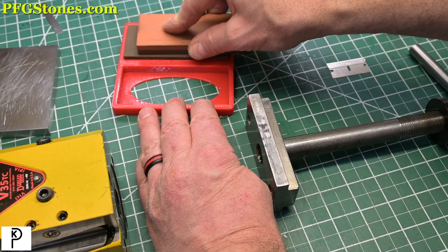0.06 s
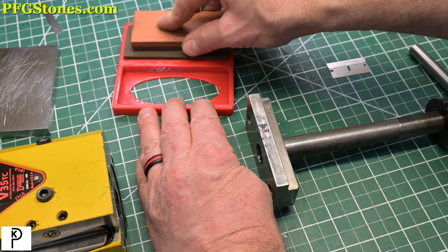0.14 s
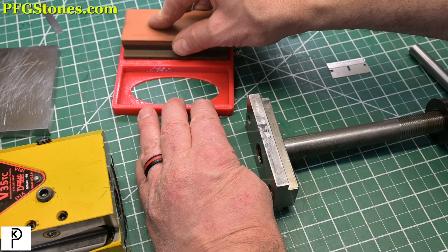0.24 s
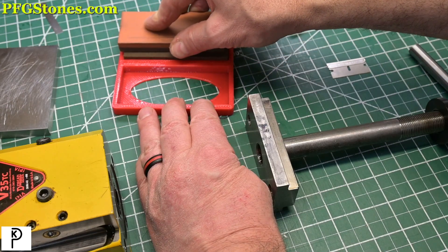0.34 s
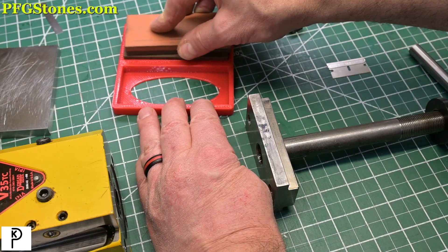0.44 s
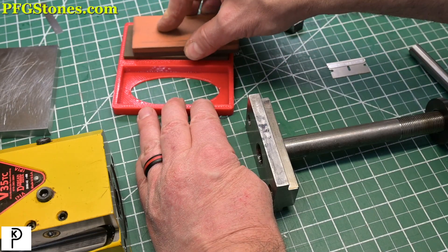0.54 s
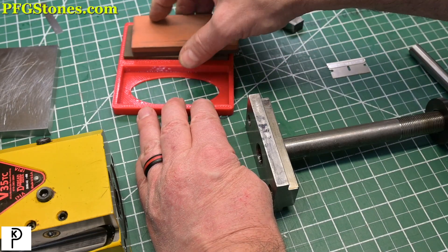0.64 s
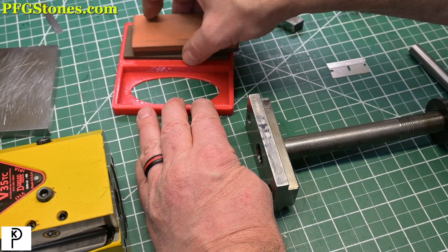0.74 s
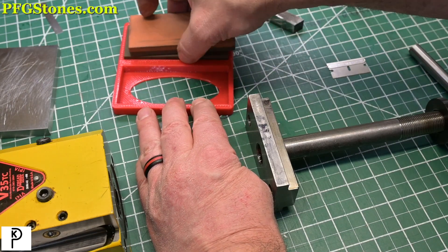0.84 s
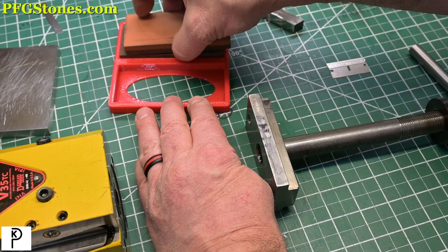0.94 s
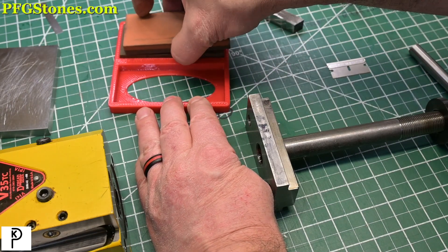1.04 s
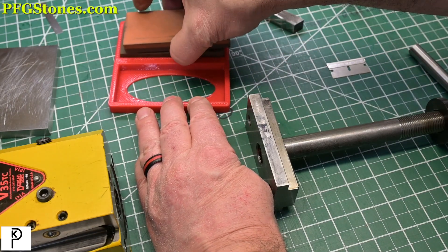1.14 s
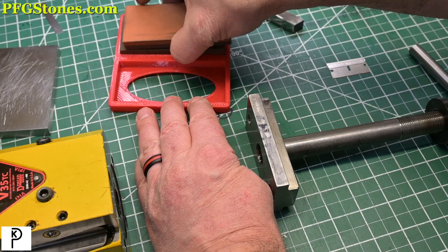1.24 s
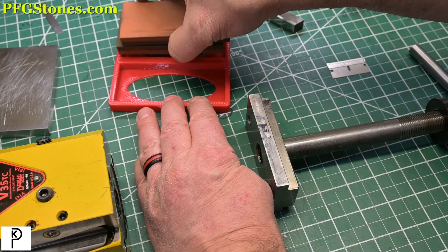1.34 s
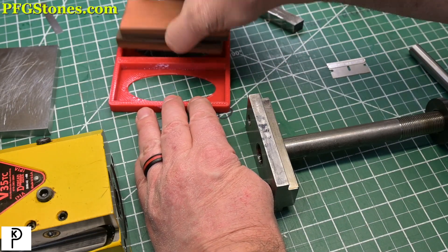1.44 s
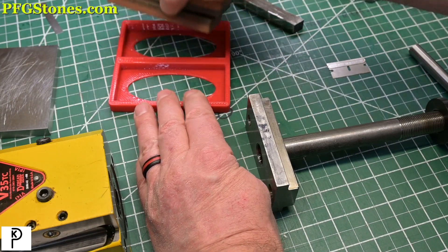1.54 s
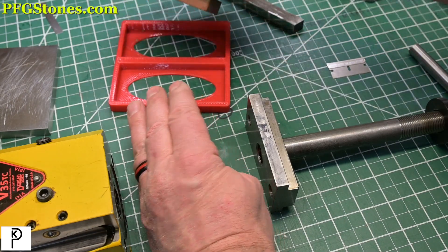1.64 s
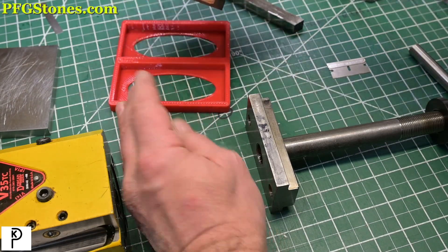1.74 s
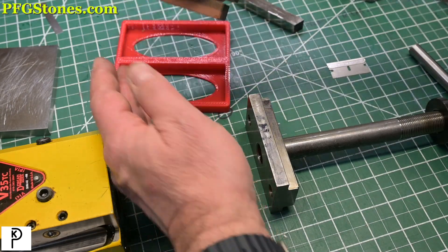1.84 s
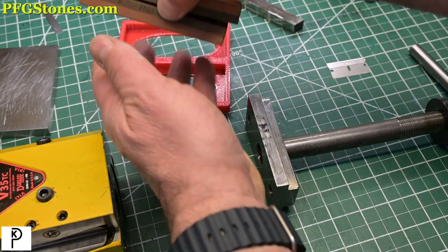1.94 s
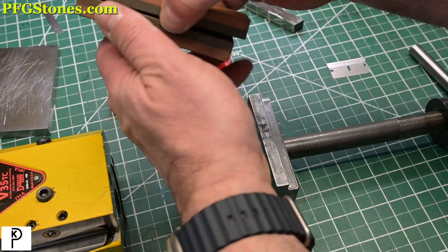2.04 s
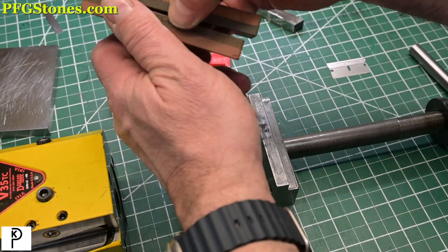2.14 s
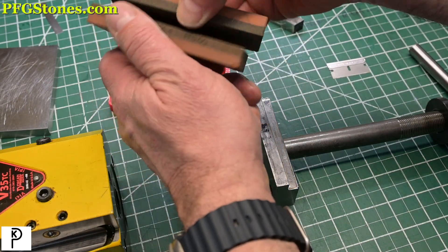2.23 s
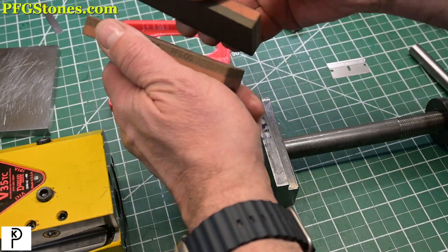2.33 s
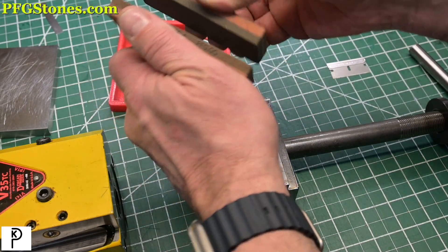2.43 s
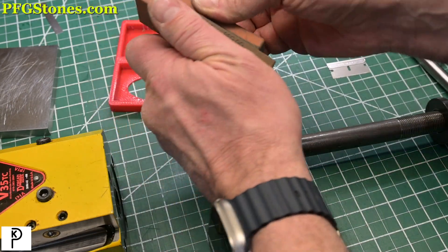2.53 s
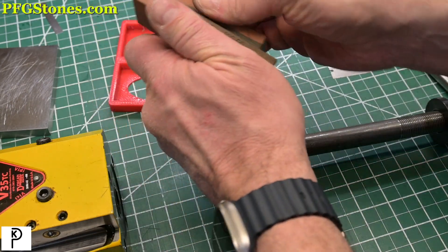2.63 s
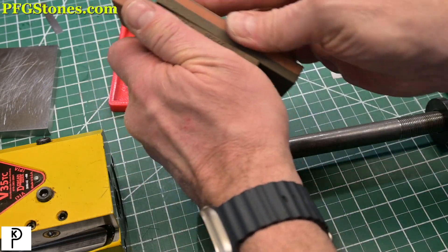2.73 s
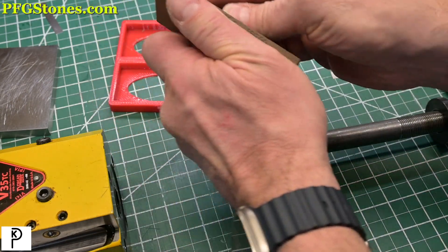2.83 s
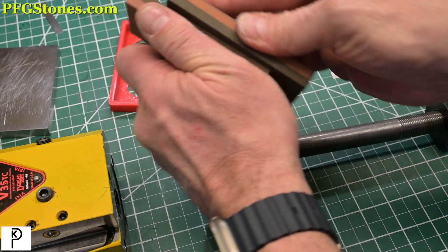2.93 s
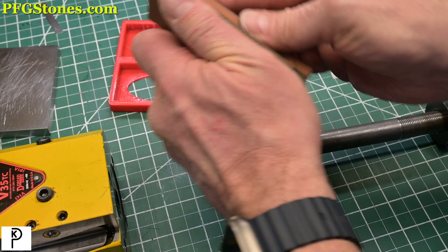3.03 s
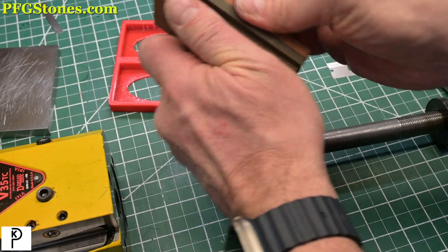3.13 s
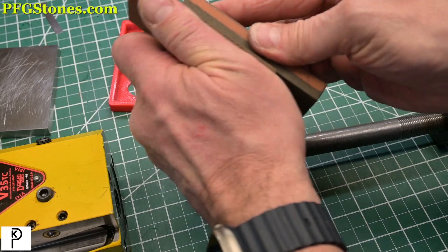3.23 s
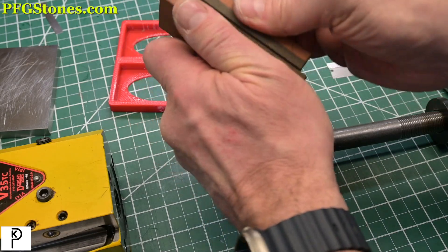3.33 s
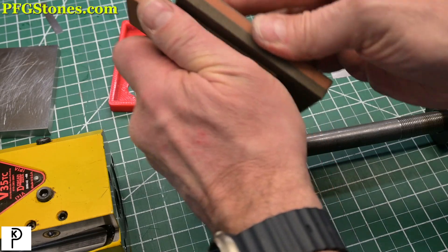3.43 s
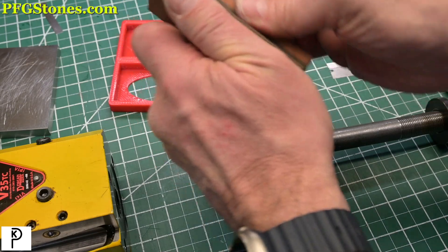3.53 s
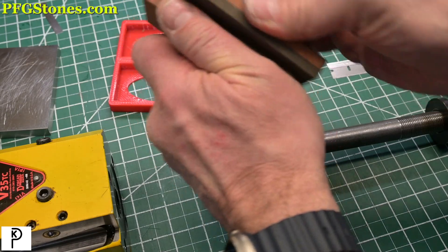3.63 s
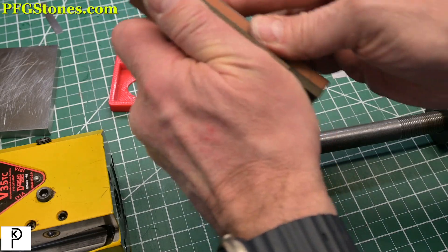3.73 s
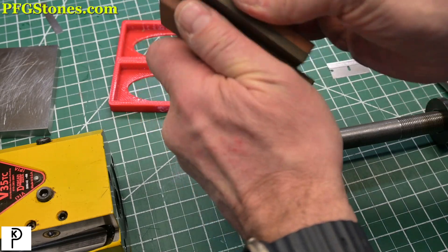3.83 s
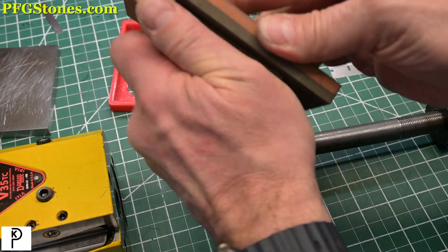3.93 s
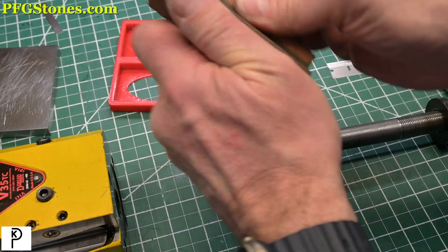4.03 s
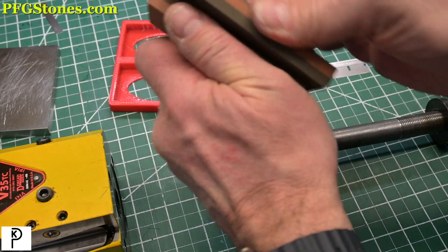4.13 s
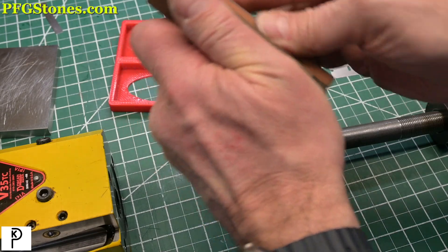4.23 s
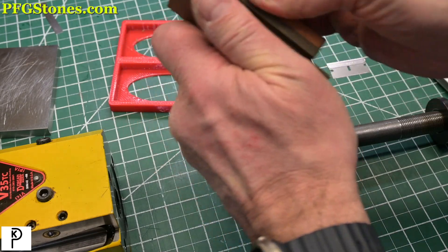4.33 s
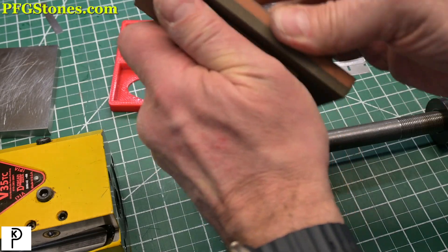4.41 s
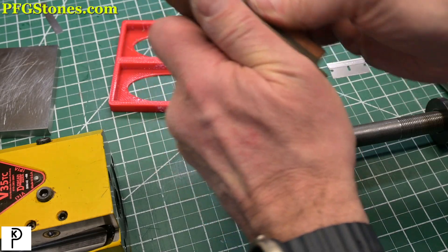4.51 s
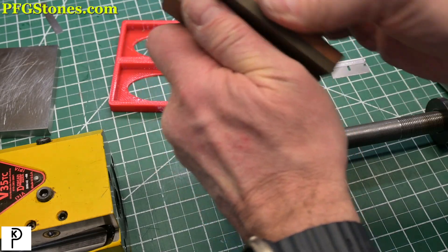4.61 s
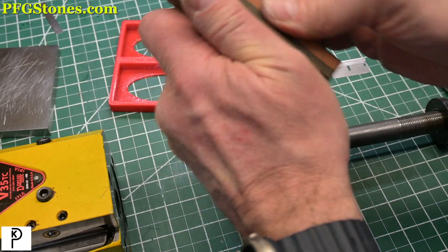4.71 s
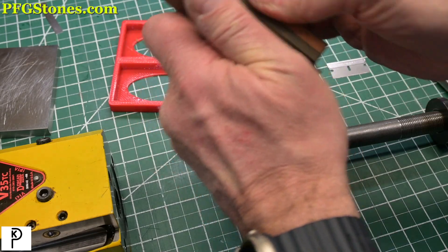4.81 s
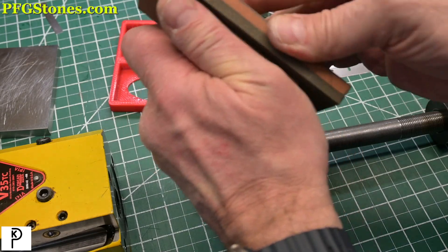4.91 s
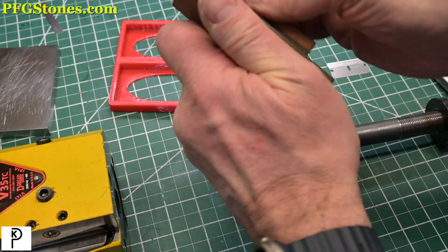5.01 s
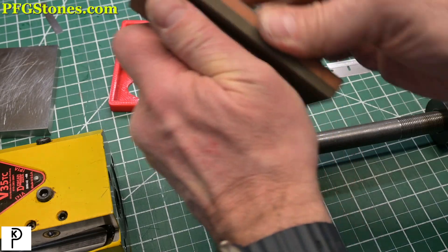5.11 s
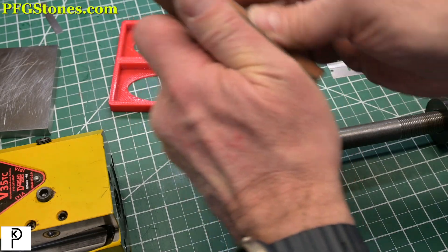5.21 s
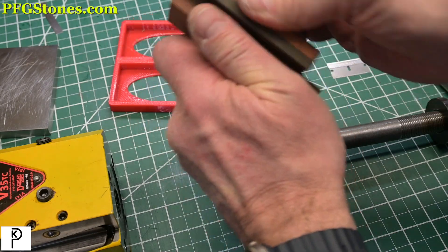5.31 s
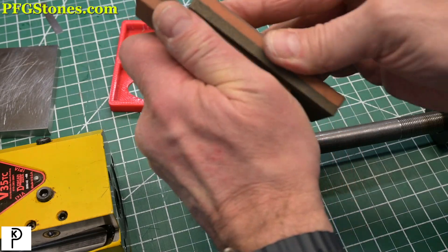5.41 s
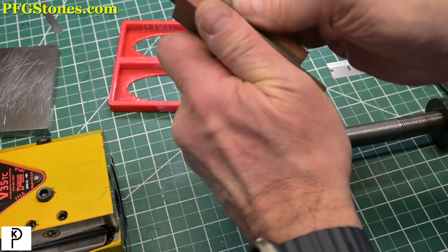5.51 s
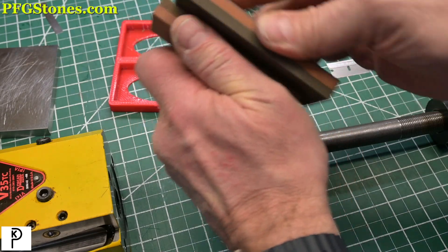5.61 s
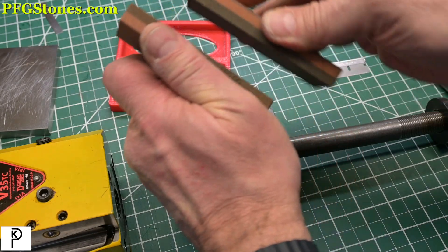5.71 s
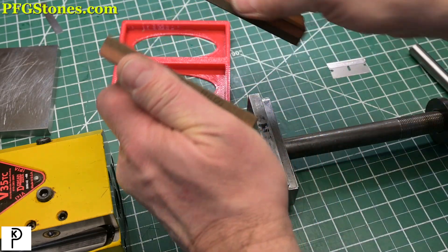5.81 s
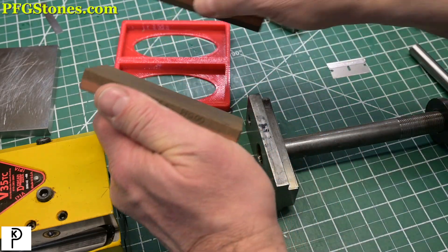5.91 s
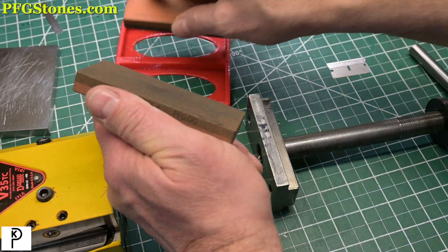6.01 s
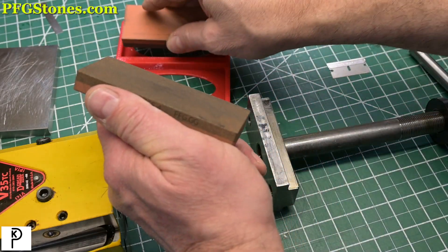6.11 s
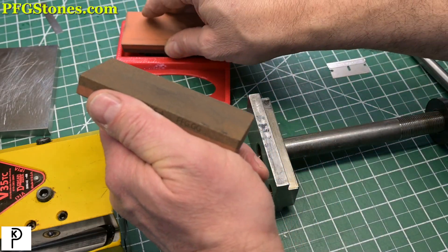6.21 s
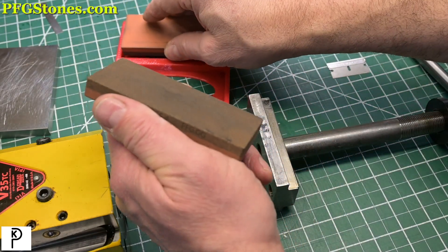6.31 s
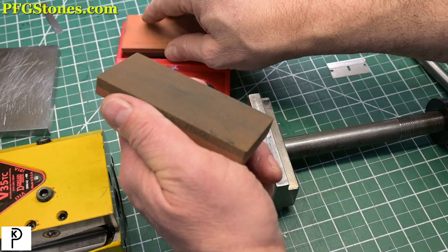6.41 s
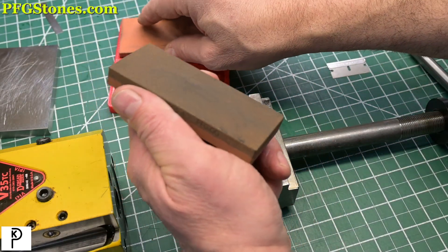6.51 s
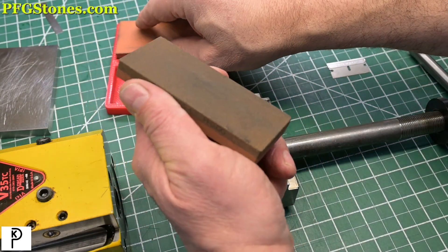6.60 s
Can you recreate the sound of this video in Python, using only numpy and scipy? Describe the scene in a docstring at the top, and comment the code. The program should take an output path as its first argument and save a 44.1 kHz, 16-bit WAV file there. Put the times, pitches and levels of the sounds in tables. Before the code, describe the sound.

A close microphone hears faint, dry stone scuffs over soft ventilation hum, then a sharp plastic snap and a short pause. Two stones meet in a quick double clack, the loudest sound, and rub face to face for about three seconds: a rhythmic swishing grind with hollow, sliding resonances. A small high ring ends the rubbing, and a very soft plastic tap is heard in the quiet, lightly reflective workshop.

```python
"""A small workshop with a low ventilation rumble, where a sharpening stone is slid about in its plastic tray.
It is pulled free with a snap, then clacked onto a second stone; decaying modes and bursts of noise make the blows.
The two are rubbed face to face in quick circles: random clicks make the grit hiss and drive resonances
that glide as the overlap of the faces changes. The stones ring as they part, and one is set back in the tray."""
import sys
import numpy as np
from scipy import signal
from scipy.fft import rfft, irfft
from scipy.io import wavfile
from scipy.ndimage import uniform_filter1d, minimum_filter1d

SR = 44100
rng = np.random.default_rng(int(sys.argv[2]) if len(sys.argv) > 2 else 0)


def digitize_waveform(pressure):
    """Quantize a signal to 16-bit integers and store it at the path in sys.argv[1].

    Rows of a 2-D input are taken as channels; values are limited to [-1, 1].
    """
    field = np.atleast_2d(pressure).T
    bounded = np.clip(field, -1, 1)
    quanta = np.round(bounded * 32767).astype(np.int16)
    wavfile.write(sys.argv[1], SR, quanta)


N = 293472
TIME = np.arange(N) / SR


def amp(db):
    """Decibels to gain."""
    return 10 ** (np.asarray(db) / 20)


def unit(x):
    """Scales to rms 1."""
    return x / np.sqrt(np.mean(x ** 2) + 1e-20)


def noise():
    """White noise for the whole scene."""
    return rng.standard_normal(N)


def read(points, hz):
    """Reads a curve of (pitch_hz, value) points on a log-frequency axis."""
    point_hz, value = np.transpose(points)
    return np.interp(np.log(hz + 1), np.log(point_hz), value)


def colour(x, spectrum):
    """Filters by a spectrum in dB."""
    hz = np.fft.rfftfreq(len(x), 1 / SR)
    return irfft(rfft(x) * amp(read(spectrum, hz)), len(x))


# the microphone's treble roll-off: pitch_hz, gain_db
MIC_ROLLOFF = [(7300, 1), (8500, -6), (9300, -13.5), (10200, -21), (12000, -38.5), (14000, -41.5),
               (16000, -63)]


def microphone(x):
    """The microphone loses the treble."""
    return colour(x, MIC_ROLLOFF)


def wander(hz):
    """Slow chance of rms 1, fading out above the given rate."""
    rate = np.fft.rfftfreq(N, 1 / SR)
    return unit(irfft(rfft(noise()) / (1 + (rate / hz) ** 4), N))


def add(mix, s, sound):
    """Mixes a sound in at time s."""
    part = mix[round(s * SR):][:len(sound)]
    part += sound[:len(part)]


def resonate(x, hz, width_hz):
    """A steep resonance that follows hz, from two equal poles each width_hz wide; rms 1."""
    turn = np.exp(2j * np.pi * np.cumsum(hz * np.ones(N)) / SR)
    r = np.exp(-np.pi * width_hz / SR)
    # shift the moving pitch down to 0 Hz, low-pass there, shift it back
    smooth = signal.lfilter([1], [1, -2 * r, r * r], x / turn)
    return unit((turn * smooth).real)


def grains(per_s, spread_db):
    """Abrasive grains catch and break: dense tiny clicks, a few of them larger; rms 1."""
    size = amp(spread_db * np.minimum(rng.exponential(1, N), 4))
    sign = rng.choice([-1, 1], N)
    return unit(size * sign * (rng.random(N) < per_s / SR))


def voiced(hz, width_hz, patchy_db):
    """Grit drives one slightly unsteady resonance, in patches as the points of contact come and go."""
    unsteady_hz = hz * (1 + 0.012 * wander(hz=50.8))
    ring = resonate(grains(per_s=15000, spread_db=2.5), unsteady_hz, width_hz)
    return ring * unit(amp(patchy_db * wander(hz=27.8)))


def swell(s, length):
    """One brief push, rising and falling about time s."""
    return np.cos(np.pi * np.clip((TIME - s) / length, -.5, .5))


def crack(t, spectrum, t60):
    """The dense, quickly dying burst of a contact."""
    return unit(colour(rng.standard_normal(len(t)), spectrum)) * amp(-60 * t / t60)


# colour of the room air: pitch_hz, relative_level_db (per Hz)
AIR_COLOUR = [(120, -31.5), (200, -3), (350, -2.5), (450, -9.5), (640, -10.5), (800, -14), (1100, -14.5),
              (2700, -18.5), (5000, -20.5), (7500, -21.5), (9500, -36.5), (10100, -39.5), (11000, -51.5),
              (14000, -62)]
# colour of the ventilation rumble: pitch_hz, relative_level_db (per Hz)
RUMBLE_COLOUR = [(20, -57), (34, -48), (55, -22.5), (70, -12.5), (85, -1.5), (100, -1.5), (118, 0.5),
                 (143, -15.5), (170, -6), (200, -17.5), (240, -39), (600, -77)]
# steady tones: pitch_hz, level_db (rms)
HUM_TONES = [(86.5, -56), (209.9, -62.5), (10008, -95)]


def workshop():
    """Ventilation rumble and air are coloured noise; the hum wavers in phase, the faint whine is narrow noise."""
    air = amp(-53) * unit(colour(noise(), AIR_COLOUR))
    rumble = amp(-50.5) * unit(colour(noise(), RUMBLE_COLOUR))
    hum = np.zeros(N)
    for hz, db in HUM_TONES:
        hum += amp(db) * unit(np.sin(2 * np.pi * hz * TIME + 0.24 * wander(hz=1.9)))
    whine = amp(-84.5) * resonate(noise(), 10020, width_hz=170)
    return air + rumble + hum + whine


# colour of the light friction: pitch_hz, relative_level_db (per Hz)
SLIDE_COLOUR = [(1500, -25), (3800, -5), (5000, -5), (6800, 1), (8500, 8.5), (12000, 5), (16000, -12)]
# fingers shift a stone, in its tray or in the hand:
# middle_s, length_s, hiss_db, low_ring_hz, low_ring_db, high_ring_db
SHIFTS = [(0.033, 0.19, -54, 4750, -66, -59), (.19, 0.15, -56, 4860, -61.5, -68),
          (0.298, .16, -59, 4890, -76, -72), (0.519, 0.19, -56, 5360, -61.5, -73),
          (0.807, 0.025, -67, 5390, -70, -55.5), (0.897, 0.047, -64, 5400, -53.5, -47.5),
          (1.091, 0.027, -54, 5440, -72, -47), (1.126, 0.056, -52.5, 5470, -71, -47),
          (1.273, .025, -75, 5390, -72, -60), (1.34, .03, -49, 5390, -62, -46),
          (2.214, 0.21, -73, 5300, -63, -69)]
HIGH_RING_HZ, HIGH_RING_WIDTH_HZ = 6950, 450


def sliding():
    """Light friction on a single stone: each shift gives a soft hiss with drifting resonances and wakes two rings."""
    hiss = unit(microphone(colour(grains(per_s=12000, spread_db=1.0), SLIDE_COLOUR)))
    drift = 1 + 0.047 * wander(hz=5)  # the contact patch creeps along
    streaks = sum(voiced(hz * drift, width_hz=210, patchy_db=3.5) for hz in (6100, 6470, 7250, 8280))
    friction = unit(hiss + amp(-6) * microphone(streaks))
    high = resonate(noise(), HIGH_RING_HZ, HIGH_RING_WIDTH_HZ)
    out = np.zeros(N)
    for s, length, hiss_db, low_hz, low_db, high_db in SHIFTS:
        low = resonate(noise(), low_hz, width_hz=160)
        out += swell(s, length) * (amp(hiss_db) * friction + amp(low_db) * low + amp(high_db) * high)
    return out


# the tray's modes: pitch_hz, relative_level_db, t60_s
TRAY_MODES = [(340, -16.5, 0.084), (1120, -21, 0.048), (2060, -13, 0.028), (2460, -2.5, 0.02),
              (2720, -4, 0.017), (3100, -6, 0.017), (3530, -5, 0.015), (3910, 5.5, 0.014),
              (4140, -1, 0.0097), (4290, -0.5, 0.017), (5900, -9, 0.031), (6320, -7, 0.031),
              (6820, -10, .02), (7370, -5, 0.022)]
# the tray's rattle of dense higher modes: pitch_hz, relative_level_db (per Hz)
RATTLE_COLOUR = [(200, -22), (700, -19), (1300, -17), (1900, -0.5), (2200, 1), (2600, 3), (3000, -0.5),
                 (3700, 0), (4300, -12), (5100, -16), (7000, -7), (8500, -15.5), (12000, -8), (16000, -18)]
# the stone knocks the tray: start_s, level_db
KNOCKS = [(1.3425, -21.5), (1.3616, -38.5), (6.233, -48.5)]


def knocks():
    """The plastic tray rings briefly: decaying modes with a burst of rattle."""
    out, t = np.zeros(N), np.arange(SR // 5) / SR
    attack = 1 - np.exp(-t / 0.00033)
    for s, blow_db in KNOCKS:
        ring = np.zeros(len(t))
        for hz, db, t60 in TRAY_MODES:
            ring += amp(db - 60 * t / t60) * np.sin(2 * np.pi * (hz * t + rng.random()))
        rattle = amp(3.5) * crack(t, RATTLE_COLOUR, t60=0.032)
        add(out, s, amp(blow_db) * (ring + rattle) * attack)
    return out


# the stones' modes: pitch_hz, edge_db (struck at the edge), face_db (struck on the face), t60_s (before hold)
STONE_MODES = [(2530, -29, -21, 0.035), (3090, -15, -25, .035), (3130, -15, -21, .03),
               (3630, -10.5, -24, 0.021), (4260, -15.5, -11, 0.031), (4970, 0.5, -19, 0.071),
               (5104, -16.5, -3.5, 0.068), (5300, -8, -12.5, 0.061), (6805, -24, 4.5, 0.052),
               (7000, -21.5, -14, 0.031), (7210, -8.5, -8.5, 0.072), (7680, -31.5, -8, .04)]
# colour of the crushed grit at a contact: pitch_hz, relative_level_db (per Hz)
CRACK_COLOUR = [(300, -39), (600, -22.5), (820, -6), (1200, -15), (1700, -7.5), (2400, -10), (3500, 1),
                (6000, 7.5), (7800, -10.5), (10000, -8), (16000, -13)]
# stone meets stone: start_s, ring_db, crack_db, flat (contact, 0 edge to 1 face), hold (factor on t60_s)
CLACKS = [(2.5545, -8, -23, 0.02, 0.98), (2.5700, 0.5, -11.5, 1, 0.4), (2.6838, -25.5, -31.5, 0.2, .6),
          (2.952, -26.5, -54, 0.95, 0.33), (3.84, -27.5, -60, 0.98, 0.37), (3.984, -41, -38.5, 0.6, 0.33),
          (4.0916, -38, -57, 1, .4)]


def clacks():
    """An edge lands and rings; then the faces slap flat and damp each other. Later, coarse grains catch."""
    out, t = np.zeros(N), np.arange(SR // 5) / SR
    attack = 1 - np.exp(-t / 0.00059)
    for s, ring_db, crack_db, flat, hold in CLACKS:
        ring = np.zeros(len(t))
        for hz, edge_db, face_db, t60 in STONE_MODES:
            mode_db = edge_db + flat * (face_db - edge_db)
            ring += amp(mode_db - 60 * t / (t60 * hold)) * np.sin(2 * np.pi * hz * t)
        grit = amp(crack_db) * crack(t, CRACK_COLOUR, t60=0.04)
        add(out, s, (amp(ring_db) * ring + grit) * attack)
    return out


# Each stroke leaves a turning point, where the faces overlap least, and passes their fullest overlap:
# turn_s, full_s, lowest_turn_hz, lowest_full_hz, second_full_hz (lowest and second resonance),
# song_db (lowest resonance), grit_full_db, grit_turn_db, fizz_db
STROKES = [(2.58, 2.676, 4950, 5080.0, 6800, -42, -39.5, -41, -73),
           (2.722, 2.789, 4950, 3550, 6840, -44.5, -42, -42.5, -53.5),
           (2.944, 3.029, 5900, 3070, 5700, -50, -43, -41, -53),
           (3.15, 3.288, 7000.0, 3020, 5750, -54.5, -43.0, -39.5, -50),
           (3.405, 3.515, 6540, 3220.0, 6060, -49.5, -42, -40, -50.5),
           (3.632, 3.781, 6630, 3100.0, 5900, -51, -43.5, -41, -45.5),
           (3.837, 3.908, 5300, 4130.0, 6240, -46.5, -41.5, -41, -47),
           (3.942, 4.019, 4480, 3210, 6000, -42, -42, -48.5, -48.5),
           (4.09, 4.151, 5100, 4250, 6100, -56, -38.5, -42.5, -44),
           (4.194, 4.258, 4780, 3520, 5980, -49.5, -37.5, -46.5, -43.5),
           (4.326, 4.373, 5130, 4180.0, 6150, -50.5, -41, -45.5, -53),
           (4.431, 4.494, 4840, 3180, 5750, -48, -44.5, -43, -43.5),
           (4.556, 4.641, 5070, 4020, 6070, -57, -42.5, -44.5, -54.5),
           (4.664, 4.736, 5640, 3960, 5500, -52, -43.5, -41, -45),
           (4.796, 4.839, 4900, 4760, 5860, -53, -46, -43.5, -55),
           (4.889, 4.957, 5300, 3400, 6000, -52, -44.5, -39, -50),
           (5.006, 5.046, 3850, 3230.0, 5950, -61, -45.5, -43, -54),
           (5.147, 5.221, 4890.0, 2700, 5450, -48.5, -46.5, -41, -51.5),
           (5.296, 5.346, 5030, 3600.0, 6170, -53.5, -46, -47.0, -51),
           (5.4, 5.493, 4420, 3150, 5900, -51, -45.5, -46, -57),
           (5.537, 5.604, 5190.0, 3840, 6630, -56, -47.5, -48, -58),
           (5.652, 5.703, 4510.0, 3290, 4900, -46, -48.0, -48, -48.5)]
RUB_END_S, RUB_END_HZ = 5.715, 3000


def stroke_motion():
    """The hand circles from turn to overlap and on: overlap 0-1, sideways sweep -1 to 1, lowest resonance in Hz."""
    rows = np.array(STROKES)
    times = np.append(rows[:, :2], RUB_END_S)  # turn, overlap, turn, overlap...
    knots = np.arange(len(times))
    phase = np.interp(TIME, times, knots)
    eased = np.floor(phase) + np.sin(np.pi / 2 * (phase % 1)) ** 2
    # the period grows with the length in contact
    period = np.interp(eased, knots, 1 / np.append(rows[:, 2:4], RUB_END_HZ))
    overlap, sweep = np.sin(np.pi / 2 * phase) ** 2, -np.sin(np.pi * phase)
    return overlap, sweep, 1 / period


def above(x, hz, loss_db):
    """Dims what lies below the moving frequency hz."""
    f, t, z = signal.stft(x, SR, nperseg=256)
    below = np.clip((np.interp(t, TIME, hz) - f[:, None]) / 500 + .5, 0, 1)
    return signal.istft(z * amp(loss_db * below), SR, nperseg=256)[1][:N]


# colour of the grit between the faces: pitch_hz, relative_level_db (per Hz)
GRIT_COLOUR = [(800, -29), (2000, -35), (3200, -12), (4600, -8), (5700, -11), (6500, -1.5), (7600, -12),
               (8600, -8), (11000, -5), (16000, -19)]
# further resonances: mid_stroke_hz, swing (share of the lowest one's), turn_rise (fraction of pitch),
# sweep_rise (fraction of pitch), width_hz, level_db (against the grit, at fullest overlap), turn_change_db
GLIDES = [(4996, 0, 0.02, 0.05, 180, -13.5, 0), (6596, 0.21, -.2, .07, 180, -12, 5),
          (7090, 0.297, .05, .08, 180, -8.5, -2.5), (7510, .05, -.1, 0, 180, -8.5, 3),
          (8360, .35, -.1, .04, 270, -7.5, 2)]
# the highest ones, fed by the finest grit:
# mid_stroke_hz, swing (share of the lowest one's), sweep_rise (fraction of pitch), width_hz, level_db (against fizz)
FIZZ_GLIDES = [(8460, 0.2, 0.03, 450, 4), (9670, 0.39, 0.03, 530, 5), (11200, 0.3, .06, 550, 1),
               (11460, .1, 0, 600, 4.5)]
MID_STROKE_HZ = 3810  # the lowest resonance, halfway through its swing
RUB_ATTACK_S, RUB_RELEASE_S = .01, 0.052
GRIT_SWEEP_DB, FIZZ_OVERLAP_DB = 1, -3  # grit swells with the speed of the sweep; fizz fades between the turns
HISS_DB, BELOW_DB = -10, -6  # grit hiss; loss of hiss and upper resonances below the lowest one
LOW_WIDTH_HZ, LOW_TURN_DB, LOW_SWEEP_DB = 270, -1.5, 2.5
SECOND_SWING, SECOND_RISE = .3, 0.13  # share of the lowest one's swing; fraction of pitch gained at a turn
SECOND_WIDTH_HZ, SECOND_DB, SECOND_TURN_DB = 340, -4.5, -2


def rubbing():
    """Grit between the faces hisses and drives resonances that glide with the overlap."""
    (turn_s, full_s, _, full_hz, second_hz,
     song_db, grit_full_db, grit_turn_db, fizz_db) = np.transpose(STROKES)
    overlap, sweep, lowest = stroke_motion()
    turn, speed, stretch = 1 - overlap, abs(sweep), lowest / MID_STROKE_HZ
    fade_in, fade_out = (TIME - turn_s[0]) / RUB_ATTACK_S, (RUB_END_S - TIME) / RUB_RELEASE_S
    touch = np.clip(np.minimum(fade_in, fade_out), 0, 1)

    # gains of the ordinary grit and of the finest
    grit_db = overlap * np.interp(TIME, full_s, grit_full_db) + turn * np.interp(TIME, turn_s, grit_turn_db)
    grind = touch * amp(grit_db + GRIT_SWEEP_DB * speed + .8 * wander(hz=21.9))
    fizz = touch * amp(np.interp(TIME, turn_s, fizz_db) + FIZZ_OVERLAP_DB * overlap)
    grit = unit(microphone(colour(grains(per_s=9000, spread_db=3), GRIT_COLOUR)))
    hiss = amp(HISS_DB) * grind * grit

    low = touch * amp(np.interp(TIME, full_s, song_db) + LOW_TURN_DB * turn + LOW_SWEEP_DB * speed)
    song = low * voiced(lowest, LOW_WIDTH_HZ, patchy_db=4.5)

    # the second resonance meets its table pitch at each fullest overlap
    second = np.interp(TIME, full_s, second_hz / full_hz ** SECOND_SWING) * lowest ** SECOND_SWING
    second *= 1 + SECOND_RISE * turn
    second_gain = grind * amp(SECOND_DB + SECOND_TURN_DB * turn)
    upper = second_gain * voiced(second, SECOND_WIDTH_HZ, patchy_db=3.0)
    for hz, swing, rise, side, width_hz, db, turn_db in GLIDES:
        path = hz * stretch ** swing * (1 + rise * turn + side * sweep)
        upper += grind * amp(db + turn_db * turn) * voiced(path, width_hz, patchy_db=4.0)
    for hz, swing, side, width_hz, db in FIZZ_GLIDES:
        path = hz * stretch ** swing * (1 + side * sweep)
        upper += fizz * amp(db) * voiced(path, width_hz, patchy_db=3.5)
    return song + above(hiss + microphone(upper), lowest, BELOW_DB)


# the edges scrape as the stones part, and sing in these modes: pitch_hz, level_db
PARTING_MODES = [(2590, -57), (3320, -58), (4980, -38), (5360, -36), (6890, -45), (7350, -56)]


def parting():
    """The last scrape rings the stones as they come free: noise through their modes in one swell."""
    ring = sum(amp(db) * resonate(noise(), hz, width_hz=174) for hz, db in PARTING_MODES)
    return swell(s=5.696, length=0.039) * ring


# the room's decay: pitch_hz, t60_s
ROOM_DECAY = [(200, 0.25), (1000, .25), (3000, 0.25), (7000, 0.14), (14000, 0.026)]


def room(x):
    """Sparse reflections, each band dying at its own speed."""
    count = SR // 2
    sparse = (rng.random(count) < 3000 / SR) * (TIME[:count] > .006)  # 3000 a second, after 6 ms
    taps = rng.standard_normal(count) * sparse
    hz, t, z = signal.stft(taps, SR, nperseg=256)
    decay = amp(-60 * t / read(ROOM_DECAY, hz)[:, None])
    tail = signal.istft(z * decay, SR, nperseg=256)[1]
    return signal.fftconvolve(x, tail / np.linalg.norm(tail))[:N]


def scene():
    """Everything happens close to the microphone; the tray, a little farther off, sends more into the room."""
    tray = microphone(knocks())
    stones = sliding() + microphone(clacks()) + rubbing() + parting()
    reflections = room(amp(-19.0) * stones + amp(-16.5) * tray)
    return (workshop() + stones + tray + reflections)[None]


CEILING, CUTOFF_HZ = .93, 14300


def record(dry):
    """A limiter holds down the loudest clack and lets the room back up; then the band limit."""
    power_db = 10 * np.log10(abs(uniform_filter1d(dry[0] ** 2, size=200)) + 1e-12)
    fall = TIME * 45  # the level detector falls 45 dB a second
    detected_db = np.maximum.accumulate(power_db + fall) - fall
    over_db = np.maximum(detected_db + 13.5, 0)  # threshold -13.5 dB
    held = dry * amp(-.4 * uniform_filter1d(over_db, size=100))
    # a quick second stage ducks the peaks that slip past
    duck = minimum_filter1d(CEILING / np.maximum(abs(held[0]), CEILING), size=80)
    held = held * uniform_filter1d(duck, size=80)
    band = signal.firwin(511, CUTOFF_HZ, window=("kaiser", 9), fs=SR)
    return signal.oaconvolve(held, band[None], "same")


dry = scene()
out = record(dry)
digitize_waveform(out)
```